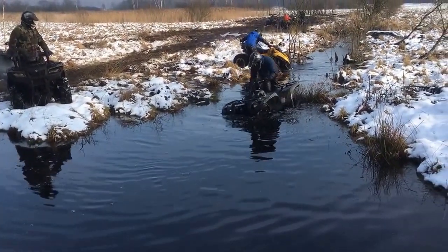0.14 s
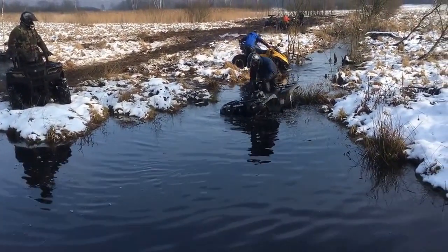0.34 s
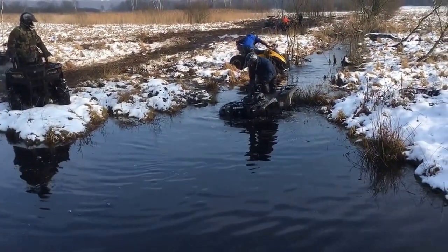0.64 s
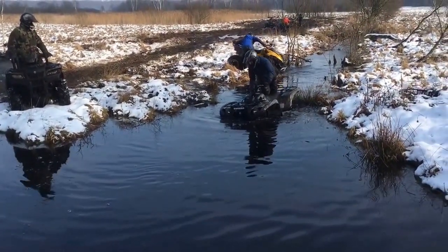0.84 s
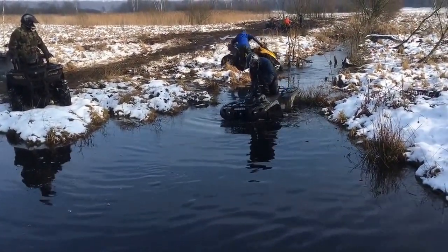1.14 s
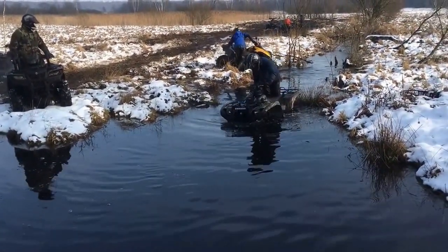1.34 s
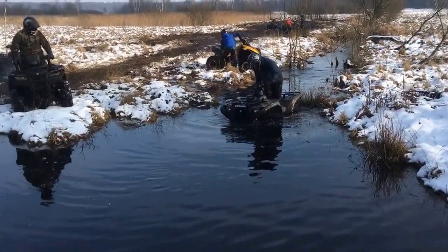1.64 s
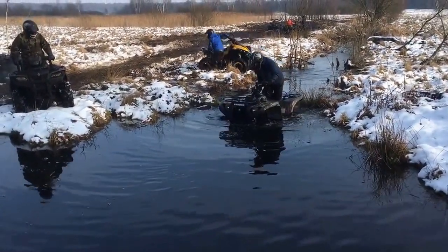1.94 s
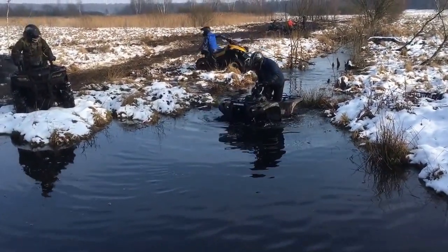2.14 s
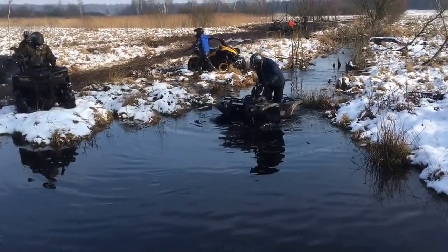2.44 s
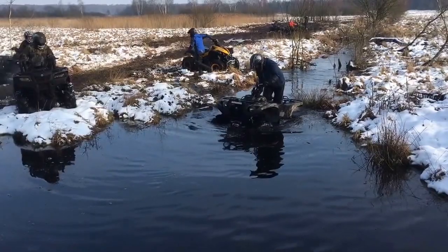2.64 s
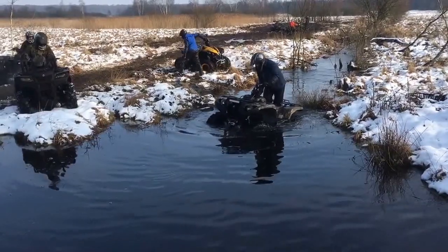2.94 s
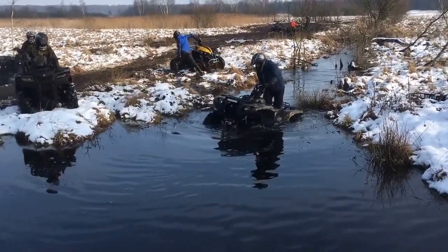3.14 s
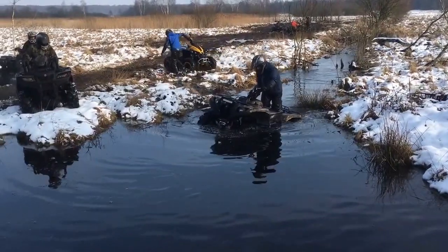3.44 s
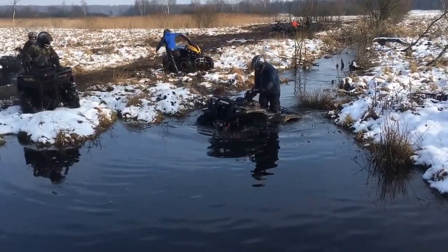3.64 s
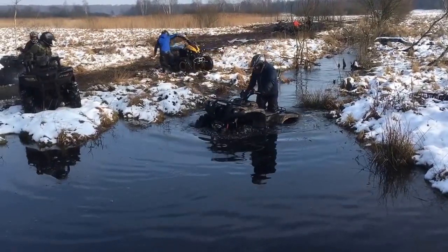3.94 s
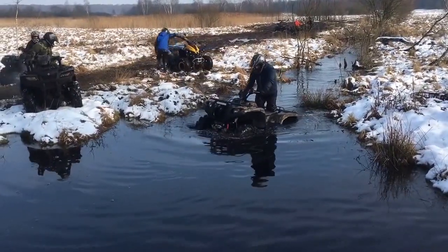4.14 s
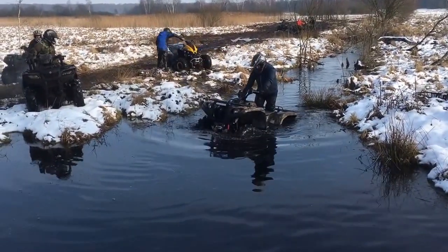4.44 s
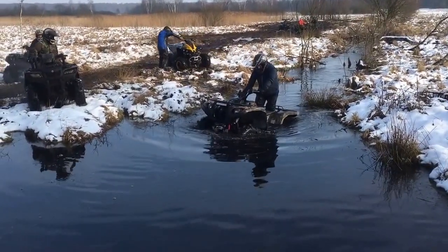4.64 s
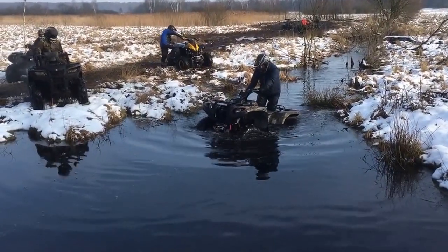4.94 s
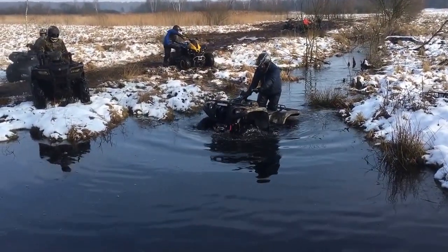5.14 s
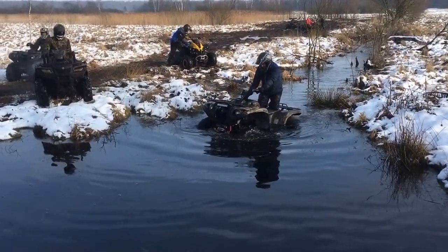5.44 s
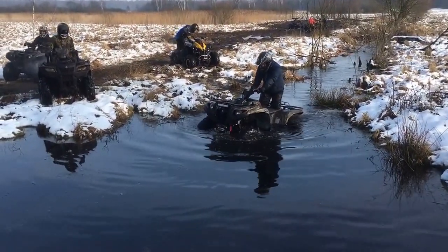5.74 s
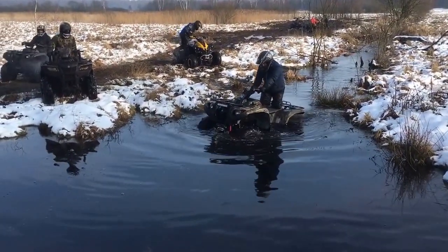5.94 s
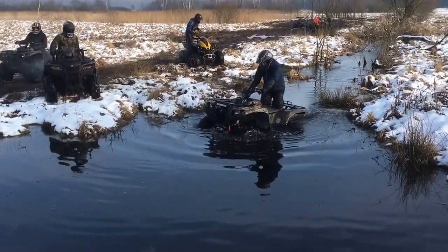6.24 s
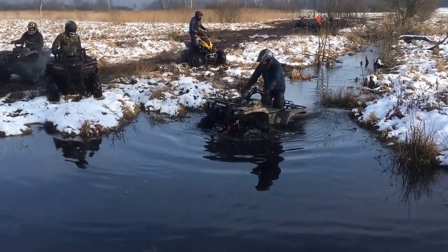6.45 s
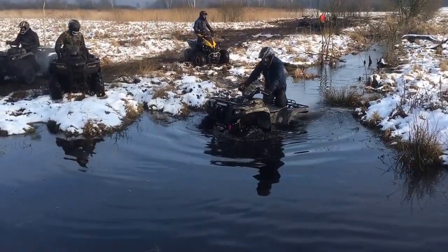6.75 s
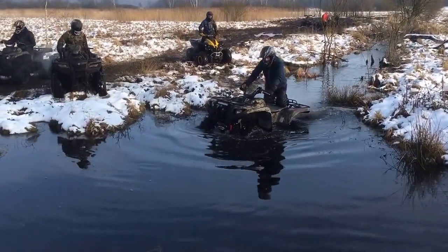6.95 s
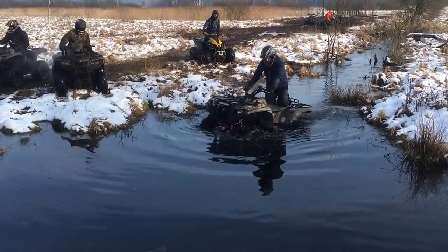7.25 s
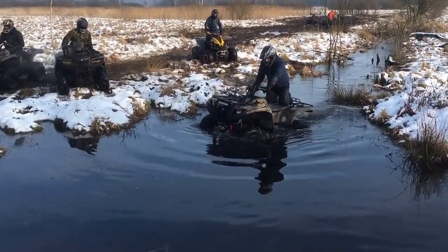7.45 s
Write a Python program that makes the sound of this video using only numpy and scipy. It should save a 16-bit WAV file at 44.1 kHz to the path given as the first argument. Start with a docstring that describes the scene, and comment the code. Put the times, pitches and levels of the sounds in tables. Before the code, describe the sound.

A quad bike pops and sputters through water with repeated throttle blips, while other quads hum and idle and the water slaps and glugs.

```python
"""First comes the popping of a one-cylinder quad bike wading through a pond. Its rider blips the
throttle, and each firing rings the tailpipe and spits gas. On the bank a second quad revs now and
then, a third drones and a fourth thumps at a slow idle. Motors and stirred water clatter and hiss
all the way through, and from about one second in the water slaps and glugs."""
import sys
import numpy as np
from scipy import signal
from scipy.fft import rfft, irfft
from scipy.io import wavfile
from scipy.ndimage import uniform_filter1d

SR = 44100
rng = np.random.default_rng(int(sys.argv[2]) if len(sys.argv) > 2 else 0)


def to_wav(sig):
    """Store sig (one row per channel, or 1-D mono) as 16-bit WAV at the path in sys.argv[1].

    Samples outside -1..1 are clipped; the rate is SR.
    """
    pcm = np.clip(np.atleast_2d(sig), -1, 1) * 32767
    pcm = np.round(pcm).astype(np.int16)
    wavfile.write(sys.argv[1], SR, pcm.T)  # frames by channels


N = 334278


def undb(db):
    """Turn decibels into a number to multiply by."""
    return 10 ** (np.asarray(db) / 20)


def unit(x):
    """Scale a signal to an average strength (rms) of 1."""
    return x / np.sqrt(np.mean(x ** 2))


def curves(table):
    """Join timed rows with straight lines: one curve for each column after the time."""
    times, *columns = np.transpose(table)
    return [np.interp(np.arange(N) / SR, times, column) for column in columns]


def ring(x, modes, passes=1):
    """Ring a hollow space at its own pitches, added with alternating sign; more passes sharpen them."""
    for _ in range(passes):
        x = sum((-1) ** k * undb(db) * signal.lfilter(*signal.iirpeak(hz, hz / width, SR), x)
                for k, (hz, width, db) in enumerate(modes))
    return x


def colour(x, points):
    """Turn lows and highs up or down along rows of pitch_hz, gain_db."""
    hz, db = np.transpose(points)
    log_hz = np.log(np.arange(N // 2 + 1) * SR / N + 1)
    return irfft(rfft(x) * undb(np.interp(log_hz, np.log(hz), db)), N)


def muffle(x):
    """A silencer takes away the treble."""
    return unit(signal.sosfilt(signal.butter(3, 300, fs=SR, output="sos"), x))


def firings(rate_hz, start_cycle, jitter_s, scatter_db):
    """One click per engine cycle, each a little early or late and of its own size."""
    cycle = np.floor(start_cycle + np.cumsum(rate_hz) / SR)
    at = np.flatnonzero(np.diff(cycle))
    timing, size = rng.standard_normal((400, 2))[:len(at)].T
    at += (jitter_s * SR * timing).astype(int)
    clicks = np.zeros(N)
    clicks[np.clip(at, 0, N - 1)] = undb(scatter_db * size)
    return clicks


def puff(clicks, rise_s, fall_s):
    """A level that jumps up at each click and dies away."""
    t = np.arange(SR // 10) / SR
    shape = (1 - np.exp(-t / rise_s)) * np.exp(-t / fall_s)
    return signal.fftconvolve(clicks, shape / shape.max())[:N]


def wander(rate_hz):
    """A smooth random drift, about 1 in size."""
    hold = int(SR / rate_hz)
    steps = np.repeat(rng.standard_normal(N // hold + 1), hold)
    return unit(uniform_filter1d(uniform_filter1d(steps, hold), hold)[:N])


# The wading quad's throttle blips: open_s, open_firings_per_s, shut_s, shut_firings_per_s
BLIPS = [(-0.0, 22.52, 0.126, 27.65), (0.329, 22.08, 0.471, 29.96), (0.674, 18.48, 0.926, 26.36),
         (1.139, 15.8, 1.367, 28.97), (1.505, 24.59, 1.789, 26.73), (1.989, 18.86, 2.105, 25.61),
         (2.315, 18.93, 2.482, 24.26), (2.601, 24.33, 2.814, 28.19), (3.05, 22.41, 3.278, 26.86),
         (3.648, 27.36, 3.909, 32.04), (4.122, 19.31, 4.314, 20.46), (4.35, 20.08, 4.703, 31.76),
         (4.842, 21.81, 4.945, 28.96), (5.17, 20.65, 5.405, 27.49), (5.589, 19.22, 5.836, 29.7),
         (5.938, 27.4, 6.167, 30.86), (6.389, 18.37, 6.683, 28.19), (6.864, 29.57, 7.011, 31.61),
         (7.163, 22.13, 7.318, 26.09), (7.415, 23.22, 7.58, 24.65)]
# Each of those blips at full load: ring_db, rasp_db, spit_db
FULL_LOAD = [(-42, -33.5, -45.5), (-42, -34.5, -37), (-44, -42, -49), (-44.5, -39, -42.5),
             (-43, -37.5, -51.5), (-42.5, -35, -45), (-36.5, -30.5, -48), (-37, -28.5, -44.5),
             (-44.5, -34, -53.5), (-57, -51, -54), (-46, -49, -52.5), (-46.5, -41.5, -58.5),
             (-39.5, -24.5, -50.5), (-36.5, -28.5, -46), (-28, -21.5, -37), (-40, -31, -40.5),
             (-41, -30, -42.5), (-36, -25, -40), (-27.5, -23, -34), (-36.5, -29.5, -45.5)]
# Levels with the throttle shut: time_s, ring_db, rasp_db, spit_db
COASTING = [(0, -47, -42, -51.5), (2.0, -41.5, -43.5, -53.5), (3.0, -46.5, -35.5, -49.5),
            (3.5, -56.5, -42, -58.5), (4.1, -47, -42, -53.5), (5.1, -46.5, -41, -57.5),
            (5.9, -48, -38, -47.5), (6.8, -39, -31.5, -43.5), (7.58, -50.5, -41, -51)]


def throttle():
    """Each blip speeds the engine up and moves its levels from coasting towards full load and back."""
    build_s, fade_s = 0.15, 0.069
    t = np.arange(N) / SR
    rate_hz = curves(np.reshape(BLIPS, (-1, 2)))[0]
    coasting_db = np.array(curves(COASTING))
    levels_db = coasting_db.copy()
    for (open_s, _, shut_s, _), full_db in zip(BLIPS, FULL_LOAD):
        load = np.clip(np.minimum((t - open_s) / build_s, 1 - (t - shut_s) / fade_s), 0, 1)
        held_s = np.clip(np.minimum(t, shut_s) - open_s - build_s, 0, None)
        load *= 1 - held_s  # the load eases while the throttle is held
        levels_db += load * (np.array(full_db)[:, None] - coasting_db)
    return rate_hz, levels_db


# Firings that stand out, sized against an average one: time_s, ring_db, gas_db
BANGS = [(.838, 6.5, 4.5), (1.04, 2.5, -8), (1.095, 5.5, -5), (1.755, 7.5, 4), (2.07, 3.5, 0.5),
         (2.235, 8, -2), (2.33, 2, 2), (2.425, -0.5, 5.5), (2.467, 5, 3), (2.511, -1.5, -5),
         (2.675, 2, -4.5), (2.711, 5, -1.5), (2.975, 6, -1), (3.02, 7, 1.5), (3.105, 1, 9), (3.181, 6.5, 8),
         (3.34, 11, -1), (5.25, 3.5, -2), (4.958, -2.5, -7), (5.333, 3.5, -7), (5.715, 2, -0.5),
         (5.755, -0.5, -3), (5.793, -3, -1), (5.828, -1, -1), (5.864, -3, 3), (5.931, 6, 6.5),
         (6.106, 11, 5), (6.141, 6, 5.5), (6.173, 4, 2), (6.474, 6, 6.5), (6.523, 5, 6.5), (6.565, 2, -0.5),
         (6.605, 0.5, -0.5), (6.639, 0, 1), (6.817, 0, 3), (6.952, 5, 3.5), (6.985, 4, -2.5),
         (7.016, -3, -0.5), (7.21, -3.5, 2), (7.252, 1, 4.5), (7.292, 4.5, -3), (7.33, -0.5, 0),
         (7.54, 2.5, 3)]


def bangs(clicks):
    """Clicks for the ring and for the gas; the firing nearest each bang takes its listed size."""
    at = np.flatnonzero(clicks)
    ring_and_gas = np.array([clicks, clicks])
    for time_s, *sizes_db in BANGS:
        nearest = at[np.argmin(abs(at - time_s * SR))]
        ring_and_gas[:, nearest] = undb(sizes_db)
    return ring_and_gas


# The note of the tailpipe: time_s, pitch_hz
PIPE_PITCH = [(0, 850), (.3, 885), (.6, 865), (.95, 850), (1.25, 815), (1.5, 880), (1.8, 915), (2.5, 905),
              (3.2, 890), (3.6, 860), (4.5, 850), (5.2, 870), (5.75, 915), (6.15, 925), (6.5, 905),
              (7.0, 910), (7.3, 915), (7.58, 890)]
# Steady notes that are blended to make it slide: pitch_hz
PIPE_NOTES = [770, 830, 890, 950]


def tailpipe_ring(drive):
    """Each firing rings the tailpipe; the note sinks as water covers its mouth."""
    width_hz, scatter_hz = 116, 26
    pitch_hz = curves(PIPE_PITCH)[0] + scatter_hz * wander(25)
    shares = np.array([np.interp(pitch_hz, PIPE_NOTES, row) for row in np.eye(len(PIPE_NOTES))])
    shares /= np.sqrt(np.sum(shares ** 2, axis=0))
    return unit(sum(ring(share * drive, [(hz, width_hz, 0)], passes=3)
                    for share, hz in zip(shares, PIPE_NOTES)))


# The rasp of rough gas: pitch_hz, width_hz, gain_db
RASP_BANDS = [(1330, 300, 0), (1577, 330, 2), (1808, 500, -1.5), (2009, 253, -1), (2590, 430, -23)]
# The pipe's mouth, half under water: pitch_hz, width_hz, gain_db
MOUTH_BANDS = [(736, 176, 0)]
# The bright tone of spitting gas: pitch_hz, gain_db
SPIT_TONE = [(1470, -2), (2500, -3), (3030, -14.5), (3940, -11.5), (4920, -24), (5650, -17), (6390, -24.5),
             (7930, -42), (10500, -38.5), (13300, -21), (15700, -26)]


def escaping_gas(clicks, drive):
    """Gas leaves the wet pipe with a gulping rasp and a bright spit, both starting with a crack."""
    # water at the mouth changes the rasp's tone from firing to firing
    wet_noise = np.zeros(N)
    for hz, width, db in RASP_BANDS:
        gain = undb(db + 2.7 * wander(20))
        wet_noise += gain * ring(rng.standard_normal(N), [(hz, width, 0)], passes=2)
    rasp = uniform_filter1d(puff(clicks, rise_s=0.0015, fall_s=0.0055), size=190) * unit(wet_noise)
    gulp = undb(-15.5 + 3 * wander(25)) * unit(ring(drive, MOUTH_BANDS, passes=2))
    crack = undb(-7 + 2.5 * wander(25)) * puff(clicks, rise_s=0.0012, fall_s=0.003)
    rasp += undb(-3) * crack * unit(ring(rng.standard_normal(N), RASP_BANDS, passes=2))
    # the spit is more even than the rasp and lingers
    linger = uniform_filter1d(puff(clicks ** 0.77, rise_s=0.0017, fall_s=0.0083), size=220)
    hiss = unit(colour(rng.standard_normal(N), SPIT_TONE))
    spit = (linger + uniform_filter1d(crack, size=120)) * hiss
    return rasp + gulp, spit


# The wading quad's silencer box: pitch_hz, width_hz, gain_db
WADE_SILENCER = [(90.8, 20, 6), (50.6, 47, 2.5), (183, 230, -13.5)]


def wading_quad():
    """Each firing kicks the tailpipe, blows out gas and thuds in the silencer."""
    rate_hz, (ring_db, rasp_db, spit_db) = throttle()
    clicks, gas_clicks = bangs(firings(rate_hz, start_cycle=-0.115, jitter_s=0.0004, scatter_db=1.3))
    rough_gas = puff(clicks, rise_s=0.002, fall_s=0.005) * rng.standard_normal(N)
    kick = puff(clicks, rise_s=0.0001, fall_s=0.00017)
    drive = unit(rough_gas) + 0.9 * unit(kick - kick.mean())
    pipe = tailpipe_ring(drive)
    rasp, spit = escaping_gas(gas_clicks, drive)
    thud = unit(ring(puff(clicks, rise_s=0.0023, fall_s=0.001), WADE_SILENCER))
    thud_db = -22.5 + 0.21 * ring_db  # follows the throttle only a little
    return undb(ring_db) * pipe + undb(rasp_db) * rasp + undb(spit_db) * spit + undb(thud_db) * thud


# The revving quad's hum: time_s, firings_per_s, gain_db
REVS = [(0, 17.8, -30), (.29, 17.8, -30), (.55, 21.1, -27), (.8, 23.9, -26), (.89, 24.6, -25.5),
        (1.05, 24.7, -25.5), (1.16, 25.3, -27), (1.5, 28.4, -29), (1.68, 27, -44), (2.1, 23.6, -47),
        (2.26, 23.5, -32), (2.34, 22.9, -30), (2.62, 22, -30), (2.85, 21.4, -34), (3.02, 21.2, -30),
        (3.17, 22.1, -29), (3.3, 23.5, -35), (3.4, 23.5, -52), (7.58, 22, -57)]
# The hum's overtones: multiple_of_firing_rate, gain_db
REV_OVERTONES = [(5, -4), (6, -6), (7, -6), (8, -0.8), (9, -6), (10, -5), (11, -6), (12, -3), (13, -5)]
# The silencer favours some of them: pitch_hz, gain_db
REV_TONE = [(100, 1), (200, -1), (222, -5), (250, -19.5), (310, -16.5), (360, -24.5)]
# The box that the gas rings: pitch_hz, width_hz, gain_db
REV_SILENCER = [(177.4, 117, 9), (215, 50, -12)]
# The steady flow of gas: time_s, level_db
REV_GAS = [(0, -29), (.15, -34), (.6, -36), (1.5, -37), (1.8, -39), (2.1, -40), (3.3, -40), (3.9, -38),
           (4.5, -35), (5.25, -34), (5.5, -40), (5.95, -37), (6.06, -53), (7.58, -51)]
# Short bursts of gas on top: middle_s, length_s, level_db
REV_BURSTS = [(2.27, 0.14, -34.5), (2.77, 0.097, -37), (2.94, 0.077, -42.5), (3.201, 0.13, -33.5),
              (4.04, 0.11, -34), (4.401, 0.086, -35.5), (5.82, 0.19, -42.5)]


def revving_quad():
    """A long pipe smears the firings into a wavering hum, over rough gas that comes in bursts."""
    t = np.arange(N) / SR
    rate_hz, hum_db = curves(REVS)
    phase = 2 * np.pi * np.cumsum(rate_hz) / SR
    hum = np.zeros(N)
    for multiple, db in REV_OVERTONES:
        gain = undb(db + 2.2 * wander(14))
        hum += gain * np.sin(multiple * phase + 2 * np.pi * rng.random() + 0.4 * wander(13))
    gas = muffle(ring(rng.standard_normal(N), REV_SILENCER, passes=2))
    flow = undb(curves(REV_GAS)[0])
    for middle_s, length_s, db in REV_BURSTS:
        flow += undb(db) * np.exp(-(2 * (t - middle_s) / length_s) ** 2)
    return undb(hum_db) * colour(hum, REV_TONE) + flow * gas


# How the drone swells and fades, before a 2 dB lift: time_s, gain_db
DRONE_SWELL = [(0.0, -27), (0.32, -30.5), (0.8, -34), (1.14, -28.5), (1.5, -30.5), (1.96, -28),
               (2.26, -31.5), (2.43, -33.5), (2.64, -27), (3.12, -35), (3.52, -29), (3.91, -32.5),
               (4.56, -29), (4.98, -29), (5.42, -28.5), (5.72, -32.5), (6.14, -29), (7.45, -30),
               (7.58, -25.5)]
# The droning quad's silencer box: pitch_hz, width_hz, gain_db
DRONE_SILENCER = [(54.1, 14, -3.5), (82.6, 16, -4.5), (111.9, 12.2, 2), (141.3, 29, -10)]


def droning_quad():
    """Soft, uneven pushes and louder rough gas ring the silencer box."""
    rate_hz = 28 * (1 + 0.02 * wander(2.5))
    clicks = firings(rate_hz, start_cycle=0, jitter_s=0.0008, scatter_db=2.5)
    push = puff(clicks, rise_s=0.0012, fall_s=0.0011)
    gas = undb(10) * rng.standard_normal(N)
    drone = muffle(ring(unit(push - push.mean()) + gas, DRONE_SILENCER))
    return undb(curves(DRONE_SWELL)[0] + 2) * drone


# The idling quad's unsteady speed: time_s, firings_per_s
THUMP_SPEED = [(0, 9.78), (.9, 10.94), (1.55, 9.77), (2.05, 11.06), (2.95, 9.84), (3.6, 11.1), (4.1, 10.28),
               (5.0, 10.41), (5.85, 12.04), (6.6, 9.69), (7.25, 11.26), (7.58, 10.52)]
# How loud it thumps: time_s, level_db
THUMP_LEVEL = [(0, -31), (3, -30), (6, -30), (7.58, -26)]
# Its silencer box: pitch_hz, width_hz, gain_db
THUMP_SILENCER = [(87.6, 55.7, 0)]


def thumping_quad():
    """Lone firings suck, then push, through a well damped silencer."""
    clicks = firings(curves(THUMP_SPEED)[0], start_cycle=-0.36, jitter_s=0.0022, scatter_db=2.2)
    return -undb(curves(THUMP_LEVEL)[0]) * unit(ring(clicks, THUMP_SILENCER, passes=3))


# The tone of motor clatter and stirred water: pitch_hz, gain_db
CLATTER_TONE = [(150, -33), (250, -6.5), (491, -14), (660, -8.5), (841, 1.5), (1110, -12), (1540, 0.5),
                (1970, -5), (2550, -20.5), (3730, -24.5), (4930, -37.5), (5560, -31.5), (7470, -52),
                (13500, -44.5), (15700, -43.5)]
# How loud they are: time_s, level_db
CLATTER_LEVEL = [(0.0, -44.5), (0.17, -44.5), (0.65, -42.5), (1.5, -43), (2.13, -44), (3.0, -43),
                 (3.45, -43), (4.08, -41), (5.66, -43), (5.85, -40), (6.31, -41.5), (6.93, -40),
                 (7.58, -43)]


def clatter():
    """Valves, belts, fans and water: a wide hiss that flickers, roughened by small ticks."""
    ticks = (rng.random(N) < 0.02) * rng.standard_normal(N)
    hiss = colour(rng.standard_normal(N) + 0.59 * unit(ticks), CLATTER_TONE)
    return unit(hiss) * undb(curves(CLATTER_LEVEL)[0] + 1.1 * wander(25))


# Slaps and glugs of water: start_s, gain_db, pitch_hz, decay_s
SPLASHES = [(.915, -36.5, 1860, 0.0086), (1.15, -35, 1990, 0.0053), (1.185, -28, 1666, 0.01),
            (1.2, -33.5, 1444, 0.01), (1.995, -31, 416, .006), (2.232, -33, 430, .006),
            (2.365, -28.5, 1502, 0.016), (2.605, -32, 395, .006), (3.061, -28.5, 1765, 0.0089),
            (3.14, -33.5, 2160, 0.01), (3.209, -35, 406, 0.0072), (3.3, -28, 2025, 0.006),
            (3.3, -25, 1470, 0.0056), (3.92, -32, 1560, 0.0085), (4.011, -36, 378, 0.0068),
            (4.09, -33, 325, 0.0066), (4.046, -32.5, 2150, 0.0047), (4.05, -30, 1490, 0.0067),
            (4.08, -22, 1610, 0.0037), (4.08, -31, 887, 0.0075), (4.196, -34, 1800, .006),
            (4.243, -35, 826, 0.012), (4.39, -30, 1980, 0.0052), (4.488, -26.5, 1710, 0.0063),
            (4.591, -32, 980, .006), (4.742, -35, 400, .006), (4.924, -29, 1353, 0.0088),
            (4.994, -30.5, 1340, 0.0073), (5.405, -31.5, 1994, 0.0087), (5.438, -24.5, 1310, 0.0062),
            (5.439, -27, 2060, 0.0072), (5.523, -25.5, 1484, 0.0071)]


def splashes():
    """Each splash is a brief, slightly rising bubble note inside louder spray of similar pitch."""
    out = np.zeros(N)
    t = np.arange(SR // 12) / SR
    for start_s, db, hz, decay_s in SPLASHES:
        bubble = np.sin(2 * np.pi * hz * t * (1 + t))
        spray = 5 * np.sqrt(1500 / hz) * rng.standard_normal(len(t))
        shape = (1 - np.exp(-t / 0.0021)) * np.exp(-t / decay_s)
        splash = ring(shape * (bubble + spray), [(hz, 0.45 * hz, 0)], passes=3)
        out[int(start_s * SR):][:len(t)] += undb(db) * splash
    return out


def scene():
    """Four quads and a pond in an open field, mixed to one channel."""
    return (wading_quad() + revving_quad() + droning_quad() + thumping_quad() + clatter() + splashes())[None]


def record(dry):
    """The microphone drops the deepest bass and the highest treble."""
    low_hz, top_hz = 47, 15870
    trimmed = signal.sosfilt(signal.butter(5, low_hz, "high", fs=SR, output="sos"), dry)
    return signal.sosfilt(signal.ellip(12, 0.2, 80, top_hz, fs=SR, output="sos"), trimmed)


dry = scene()
out = record(dry)
to_wav(out)
```